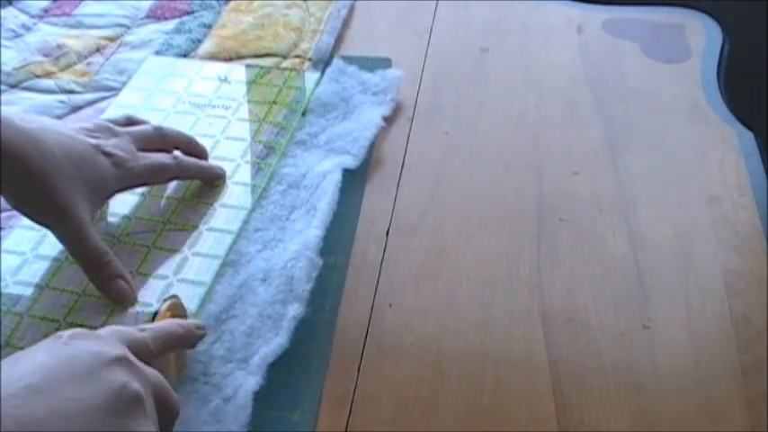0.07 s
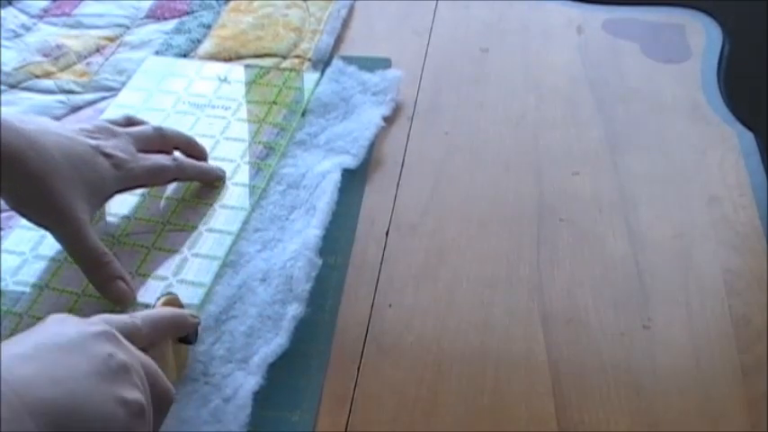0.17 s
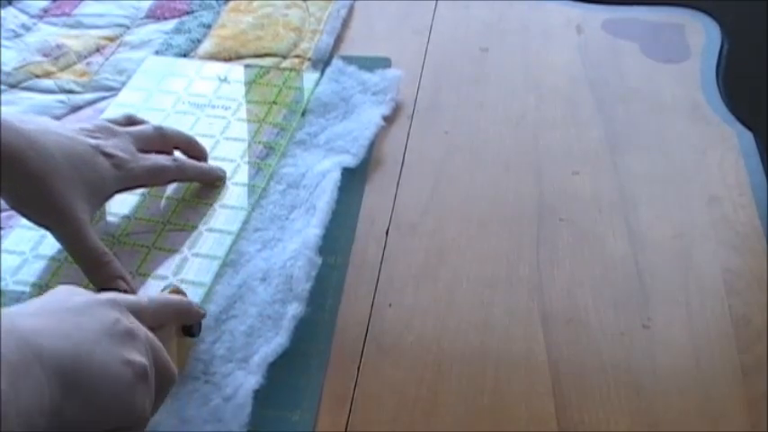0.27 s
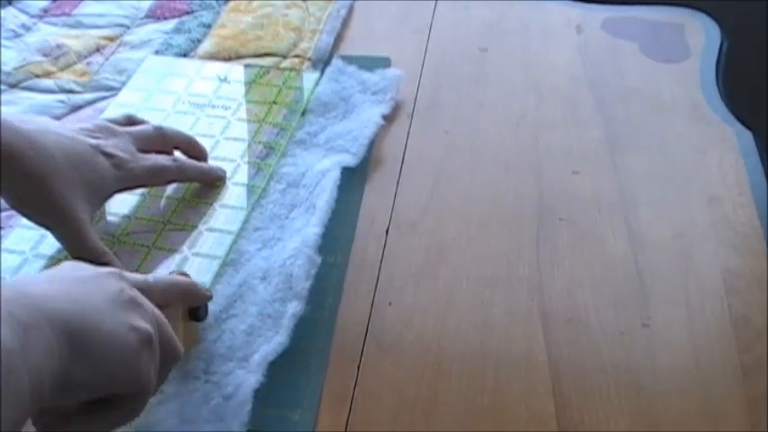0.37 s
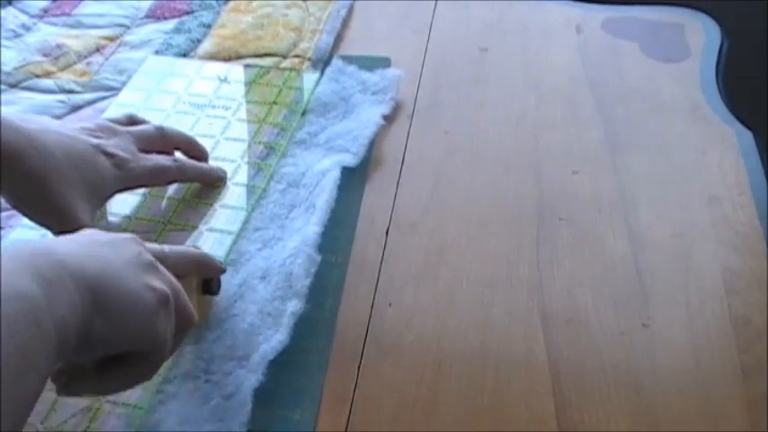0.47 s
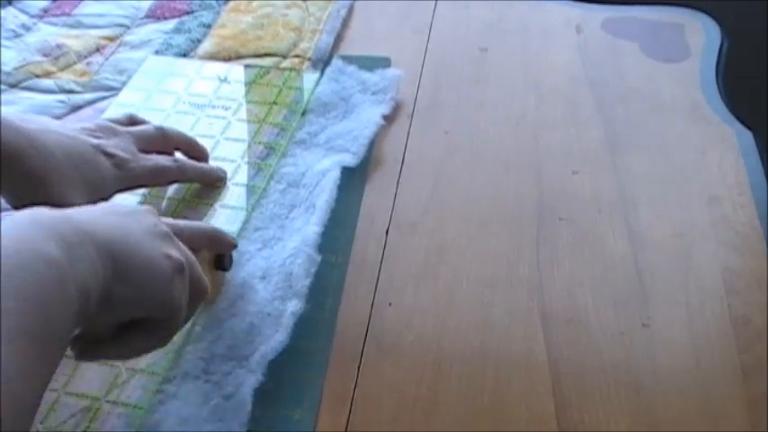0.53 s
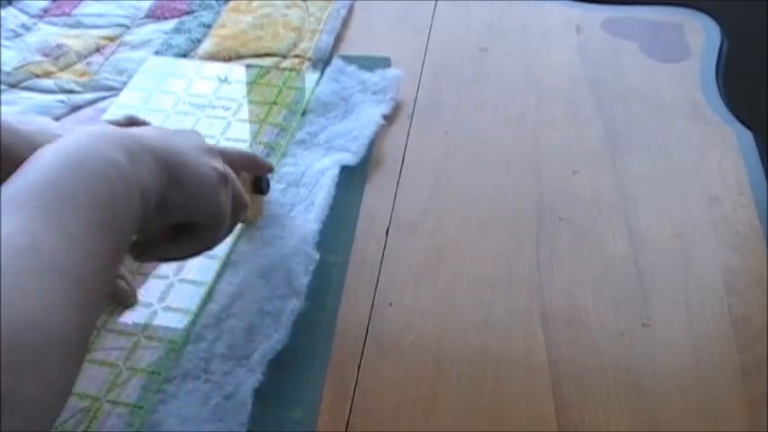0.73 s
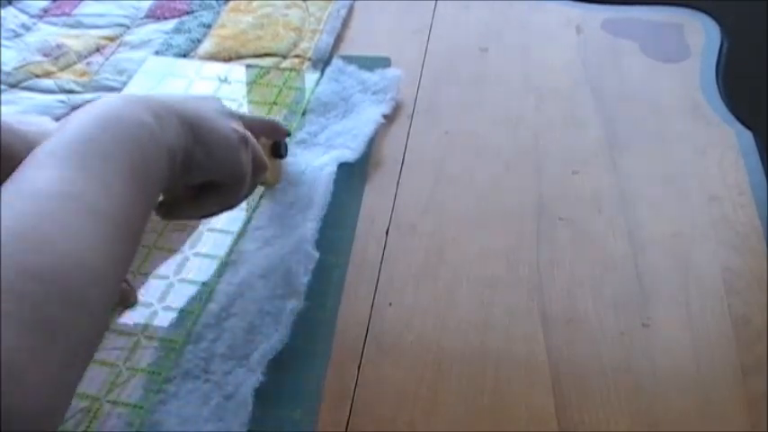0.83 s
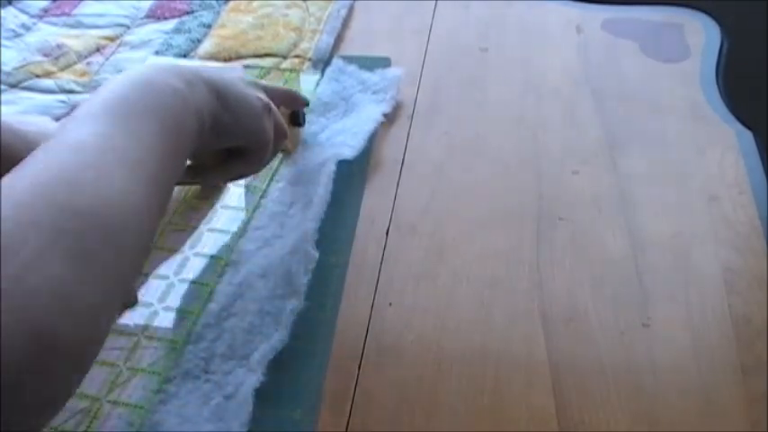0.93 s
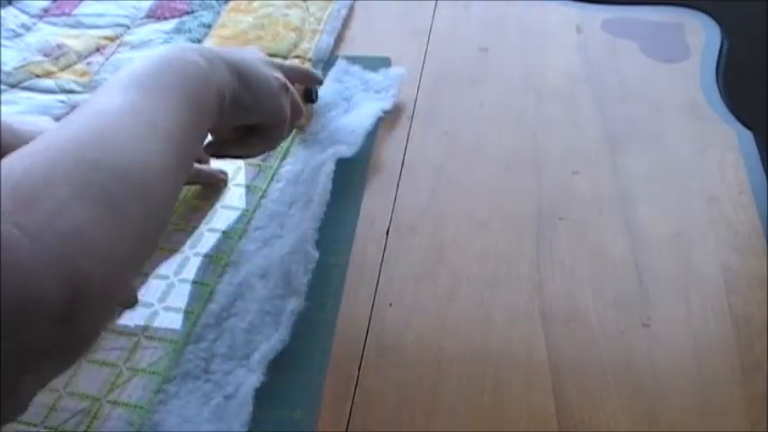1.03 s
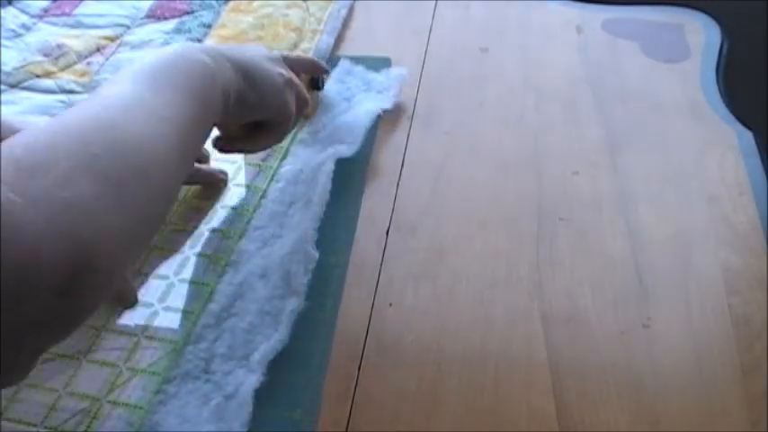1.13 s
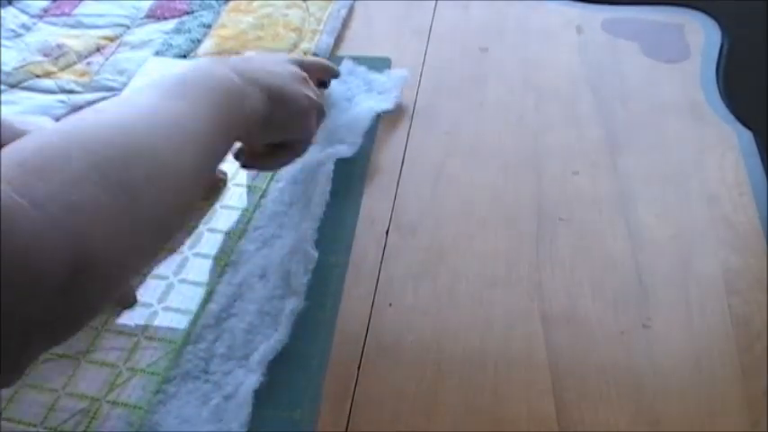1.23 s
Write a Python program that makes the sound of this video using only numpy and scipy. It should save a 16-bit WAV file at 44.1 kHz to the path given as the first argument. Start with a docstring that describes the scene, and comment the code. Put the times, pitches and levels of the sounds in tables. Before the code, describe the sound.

A rotary cutter slices batting on a mat over a table, heard close in stereo in a small quiet room. Tiny plastic handle ticks come at 0-0.1 seconds, then a sharp woody knock with a quick bounce at 0.2. A crunchy, crackling roll swells from 0.3, strongest about 0.55-1.1, with crisp fibre snaps. It rolls off softly until 1.25, leaving faint hiss and whine.

```python
"""In a small quiet room, heard from close by, the handle of a rotary cutter ticks as it is gripped.
The wheel is set down on a cutting mat and bounces: noise cracks over a knock of fading sine waves.
It rolls along a ruler through batting: random snaps ring mat and table and are heard as crisp treble.
The blade runs off the batting, rolls on softly and stops, leaving hiss and a faint whine.
Filtered echoes and a short noise-built tail place the cutter in the room, in stereo."""
import sys
import numpy as np
from scipy import signal
from scipy.fft import rfft, irfft
from scipy.io import wavfile

SR = 44100
rng = np.random.default_rng(int(sys.argv[2]) if len(sys.argv) > 2 else 0)


def generate_wav(sig):
    """Save sig (samples, or channels by samples) to the path in sys.argv[1] as 16-bit PCM at SR."""
    pcm = np.round(np.clip(np.atleast_2d(sig).T, -1, 1) * 32767).astype(np.int16)
    wavfile.write(sys.argv[1], SR, pcm)


N = 57330  # length of the scene in samples, 1.3 s

# broad colour of something snapping against the mat: f/Hz, level/dB
MAT_COLOUR = [(40, -44), (120, -45.5), (220, -27), (330, -15), (480, -7.5), (800, -2.5), (1050, -8),
              (1500, -2.5), (2200, -8), (3300, -7.5), (4400, -19), (8000, -26.5), (11000, -42),
              (15000, -83)]


def amp(db):
    """Turns decibels into a gain: every 20 dB is a factor of ten."""
    return 10 ** (np.asarray(db) / 20)


def evened(x):
    """Scales a sound to an average strength (rms) of 1."""
    return x / np.sqrt(np.mean(x ** 2) + 1e-20)


def read(points, hz):
    """Reads a table at the given frequencies, with straight lines on a log-frequency axis."""
    f, value = np.transpose(points)
    return np.interp(np.log(hz + 1), np.log(f + 1), value)


def level(points):
    """Gain over time, joining rows of time and decibels with straight lines."""
    return amp(np.interp(np.arange(N) / SR, *np.transpose(points)))


def add(mix, s, sound):
    """Mixes a sound in, starting at s seconds."""
    part = mix[max(round(s * SR), 0):][:len(sound)]
    part += sound[:len(part)]


def flipped(x):
    """The same snaps, each pushing one way or the other at random."""
    return x * rng.choice([-1., 1.], len(x))


def colour(x, points, size=4096):
    """Filters to the given spectrum, with no sound ahead of its cause (minimum phase)."""
    log_gain = np.log(amp(read(points, abs(np.fft.fftfreq(size, 1 / SR)))))
    spectrum = np.exp(np.conj(signal.hilbert(log_gain)))
    taps = np.fft.ifft(spectrum).real[:size // 2]
    return signal.fftconvolve(x, taps)[:len(x)]


def resonate(x, hz, width):
    """One steep-sided resonance of gain 1; hz may be a curve over time."""
    r = np.exp(-np.pi * width / SR)
    turn = np.exp(2j * np.pi * np.cumsum(hz * np.ones(len(x))) / SR)
    # shift the resonance down to 0 Hz, smooth twice, shift back up
    shifted = x / turn + 1e-18
    smooth = signal.lfilter([(1 - r) ** 2], [1, -2 * r, r ** 2], shifted)
    return 2 * (turn * smooth).real


def burst(decay_s, points, size=2048):
    """A short crack of energy 1: fading noise, coloured by the given spectrum."""
    fade = np.exp(-np.arange(size) / SR / decay_s)
    crack = colour(rng.standard_normal(size) * fade, points)
    return crack / np.linalg.norm(crack)


def surges(rate_hz, depth_db):
    """A gain that rises and falls at random, mostly around the given rate; depth is its rms in dB."""
    ratio = np.fft.rfftfreq(N, 1 / SR) / rate_hz
    spectrum = rfft(rng.standard_normal(N)) * ratio ** .5 / (1 + ratio ** 2)
    return amp(depth_db * evened(irfft(spectrum, N)))


def room_tone():
    """Soft coloured hiss, partly alike on left and right, with a faint steady whine."""
    # colour of the hiss: f/Hz, relative level per Hz/dB
    hush = [(25, -34), (60, -17), (130, -2), (400, 4), (1100, 2), (2000, -8.5), (3400, -5.5), (5200, -13.5),
            (7500, -12), (10000, -19), (15000, -33)]
    # left-right likeness of the hiss: f/Hz, likeness (1 the same, 0 unrelated, -1 opposite)
    likeness = [(60, -0.48), (400, -0.044), (2000, -0.74), (6000, 0.67), (15000, -0.28)]
    hiss_db, whine_db, whine_hz = -57.5, -71, 1066  # both levels rms
    hz = np.fft.rfftfreq(N, 1 / SR)
    a, b = rfft(rng.standard_normal((2, N))) * amp(read(hush, hz))
    same = np.clip(read(likeness, hz), -1, 1)
    right = same * a + np.sqrt(1 - same ** 2) * b
    hiss = evened(irfft(np.array([a, right]), N))
    whine = np.sqrt(2) * np.sin(2 * np.pi * whine_hz * np.arange(N) / SR)
    return amp(hiss_db) * hiss + amp(whine_db) * whine


def room(x):
    """A short tail made of noise, with a separate fading time for each frequency."""
    # time for the tail to fade by 60 dB: f/Hz, t/s
    fade_times = [(100, 0.92), (1000, 0.44), (4000, 0.078), (15000, 0.32)]
    t = np.arange(SR // 3) / SR
    noise = rng.standard_normal(len(t)) * (t > .008)
    hz, at, z = signal.stft(noise, SR, nperseg=256)
    fade = amp(-60 * at / read(fade_times, hz)[:, None])
    tail = signal.istft(z * fade, SR, nperseg=256)[1][:len(t)]
    return signal.fftconvolve(x, tail / np.linalg.norm(tail))[:N]


def echoes(x, count=12):
    """Quick echoes off the table top and arms; their pattern changes as the cutter travels."""
    decay_s = 0.0085
    t, place = np.arange(SR // 25) / SR, np.linspace(0, count - 1, N)
    out = np.zeros(N)
    for k in range(count):
        taps = rng.standard_normal(len(t)) * np.exp(-t / decay_s) * (t > .001)
        near = np.cos(np.pi / 2 * np.clip(place - k, -1, 1))  # blends one pattern into the next
        out += signal.fftconvolve(x * near, taps / np.linalg.norm(taps))[:N]
    return out


def handle():
    """Tiny plastic ticks as the handle is gripped: short noise cracks, partly dulled by the mat."""
    # the ticks: t/s, level/dB, share of the mat's colour (0-1)
    ticks = [(.002, -26, 0.04), (.0068, -25.5, 0.02), (0.0593, -32, 0.75), (0.079, -33.5, 0.55)]
    # colour of the plastic: f/Hz, level/dB
    plastic = [(100, -57), (3500, -23), (4500, 13.5), (5600, 6), (7300, 18), (8500, -6), (15000, -24)]
    out = np.zeros(N)
    for s, db, share in ticks:
        bright = (1 - share) * burst(0.0015, plastic)
        dull = share * burst(0.002, MAT_COLOUR)
        add(out, s, amp(db) * (bright + dull))
    return out


def set_down():
    """The wheel meets the mat and bounces; each contact cracks and rings the table briefly."""
    # contacts: t/s, level/dB
    contacts = [(0.2081, 1), (0.2154, -8.5), (0.2432, -27)]
    # ringing modes of the knock: f/Hz, level/dB, time to fade by 60 dB t/s
    modes = [(400, -40, 0.086), (490, -37, 0.087), (810, -43, 0.11), (906, -31.5, 0.078), (1083, -35, .055),
             (1242, -30, 0.032), (1346, -34, 0.084), (1703, -33.5, .025), (1760, -32, 0.032),
             (2110, -42, 0.034), (2530, -41, 0.037), (3054, -43, 0.032), (3500, -46.5, .025)]
    # colour of each crack: f/Hz, level/dB
    contact_colour = [(50, -42), (150, -14), (380, 6.5), (900, 5), (1500, -1), (2400, -2), (4200, -16),
                      (5500, -13), (7200, -4.5), (9000, -23), (15000, -52)]
    crack_db, crack_decay_s = -15.5, .003  # level is added to that of the contact
    rise_cycles = 1.22  # counted in cycles, so low modes take longer to build up
    out, t = np.zeros(N), np.arange(SR // 4) / SR
    ring = np.zeros(len(t))
    for hz, db, t60 in modes:
        rise = 1 - np.exp(-(t * hz / rise_cycles) ** 2)
        ring += amp(db - 60 * t / t60) * rise * np.sin(2 * np.pi * hz * t)
    for s, db in contacts:
        add(out, s, amp(db) * ring)
        add(out, s, amp(crack_db + db) * burst(crack_decay_s, contact_colour))
    return out


def snaps():
    """Fibres snap at random with uneven strength, over a smooth rub, nearly evenly spread."""
    snaps_per_s, spread_db, rub = 2500, 3, 0.4  # rub is its strength beside the clicks
    surge_hz, surge_db = 151, 0.53
    size = amp(spread_db * np.minimum(rng.exponential(1, N), 3.5))
    clicks = size * rng.choice([-1., 1.], N) * (rng.random(N) < snaps_per_s / SR)
    rubbed = evened(clicks) + rub * rng.standard_normal(N)
    return evened(rubbed * surges(surge_hz, surge_db))


def tuft(size=1024):
    """One sharp snap, then a brief crumble of the fibres around it; energy 1."""
    decay_s, crumble_db = 0.0013, -3  # level beside the snap
    crumble = rng.standard_normal(size) * np.exp(-np.arange(size) / SR / decay_s)
    snap = signal.unit_impulse(size) + amp(crumble_db) * crumble / np.linalg.norm(crumble)
    return snap / np.linalg.norm(snap)


def table_ring(pressed):
    """Resonances of mat and table, each driven hardest as the wheel passes one spot, and gliding."""
    # one resonance a row: passing t/s, reach t/s, f at passing/Hz, glide/(Hz per s), width/Hz,
    # level/dB
    resonances = [(0.52, 0.17, 3265, 0, 470, -2), (0.52, 0.14, 1352, -100, 156, 5.5),
                  (0.48, 0.23, 1170, 102, 58, 6.5), (0.521, 0.096, 2517, 402, 244, 5.5),
                  (0.54, 0.2, 1837, 8, 170, 0.5), (.57, 0.26, 805, 62, 52, 5), (0.653, .1, 2930, 9, 450, 3),
                  (0.712, 0.093, 1924, 900, 202, 6), (0.883, 0.16, 1260, -300, 160, 4),
                  (0.858, 0.089, 2516, 1498, 550, 5), (0.94, 0.8, 483, -100, 170, -3),
                  (0.84, .22, 3640, 5, 540, -4.5), (0.972, 0.051, 2880, 1000, 160, 2.5),
                  (0.983, 0.05, 625, 0, 82, 6.5), (1.035, 0.041, 2085, 2000, 590, 5.5),
                  (1.089, 0.027, 1037, 0.5, 220, 2.5), (1.085, 0.024, 1288, -3, 155, 10),
                  (1.18, 0.033, 1312, -5, 49, 12), (1.153, 0.034, 2390, 4000, 590, 4.5)]
    low_cut_hz = 304  # keeps the lows out of the ringing
    t, ring = np.arange(N) / SR, np.zeros(N)
    for passing, reach, hz, glide, width, db in resonances:
        near = np.exp(-.5 * ((t - passing) / reach) ** 2)
        gliding_hz = hz + glide * (t - passing)
        ring += amp(db) * resonate(flipped(pressed) * near, gliding_hz, width)
    low_cut = signal.butter(4, low_cut_hz, "high", fs=SR, output="sos")
    return signal.sosfilt(low_cut, ring)


def ruler_rasp(drive):
    """A thin rasp of the blade's edge on the ruler: the snaps through one high resonance."""
    # the rasp: middle t/s, spread around it t/s, f/Hz, width/Hz
    rasp_shape = (.936, .016, 9300, 1500)
    s, length, hz, width = rasp_shape
    swell = np.exp(-.5 * ((np.arange(N) / SR - s) / length) ** 2)
    return amp(-44) * swell * evened(resonate(drive, hz, width))


def cut():
    """The snaps drive the mat and the table's resonances, and are heard directly as crisp treble."""
    # force on the blade, before the body gain: t/s, level/dB
    force = [(.2, -62.5), (.26, -55), (.33, -44.5), (.39, -46.5), (.44, -40.5), (.51, -42), (.555, -35),
             (.615, -36), (.65, -37.5), (.68, -34), (.8, -36.5), (.89, -36), (.94, -33), (1.005, -37.5),
             (1.037, -36), (1.06, -37.5), (1.09, -35), (1.125, -54.5), (1.2, -47.5), (1.26, -62.5)]
    # the crisp treble of the shearing fibres: t/s, level/dB
    shear_level = [(.2, -74), (.3, -60.5), (.4, -61), (.45, -53.5), (.52, -52), (.58, -42), (.615, -48.5),
                   (.67, -47), (.76, -41.5), (.81, -45), (.89, -45), (.935, -43), (1.0, -45.5),
                   (1.045, -44), (1.065, -50), (1.1, -50), (1.13, -60), (1.195, -54), (1.25, -71)]
    # colour of the shearing: f/Hz, level/dB
    fibre_colour = [(100, -34.5), (2000, -5), (3800, 2), (5300, -1.5), (7200, 0.5), (8600, -7),
                    (10000, -10), (11500, -16), (13500, -21.5), (15300, -35)]
    # thicker tufts that give way at once: t/s, push on the mat before the body gain: level/dB,
    # crisp crack: level/dB
    tufts = [(0.402, -21, -40), (0.4537, -17.5, -30), (0.4738, -15.5, -45), (.4885, -13, -36),
             (0.5472, -15, -26), (.579, -14, -24), (.603, -9.5, -32), (.621, -10, -29), (0.674, -6.5, -27),
             (0.685, -16.5, -23), (.696, -12, -29), (.731, -12.5, -26), (0.7524, -7, -29), (.765, -8, -29),
             (.786, -10.5, -22), (.8125, -11.5, -16.5), (.828, -13.5, -24), (1.035, -10, -23),
             (1.045, -14, -15), (1.073, -11, -32), (1.087, -12.5, -33)]
    crackle_hz, crackle_db = 59.6, 1  # the treble of the shearing surges unevenly
    body_db = 8  # gain of mat and table together
    drive = snaps()
    pressed = drive * level(force)
    crackle = flipped(drive) * surges(crackle_hz, crackle_db)
    shear = evened(colour(crackle, fibre_colour)) * level(shear_level)
    for s, push_db, crack_db in tufts:
        crack = colour(tuft(), fibre_colour)
        add(pressed, s, amp(push_db) * tuft())
        add(shear, s, amp(crack_db) * crack / np.linalg.norm(crack))
    body = colour(pressed, MAT_COLOUR) + table_ring(pressed)
    return amp(body_db) * body + shear + ruler_rasp(drive)


def scene():
    """The cutter, nearly centred; the knock's quick echoes are weaker in the middle than the stroke's."""
    # level of the side signal, which sets left and right apart: f/Hz, level/dB
    side_colour = [(60, -24), (200, 0), (400, -22), (1000, -16.5), (3000, -18.5), (6000, -14), (8300, -4.5),
                   (10500, -4.5), (15000, -40)]
    echo_db, knock_echo_db, room_db = -6.5, -5, -12  # the knock's is on top of echo_db
    side_room_db = -6.5  # beside the side echoes
    stroke, knock = cut() + handle(), set_down()
    direct = stroke + knock
    early = echoes(stroke + amp(knock_echo_db) * knock)
    mid = direct + amp(echo_db) * early + amp(room_db) * room(direct)
    side = colour(echoes(direct) + amp(side_room_db) * room(direct), side_colour)
    return np.array([mid + side, mid - side]) + room_tone()


def record(dry):
    """Two microphone ports: the left is louder except in the high treble; then the band limit."""
    # balance of the ports: f/Hz, left minus right level/dB
    balance = [(60, 1.5), (400, 3.5), (1300, 1.9), (4400, 1.5), (8500, 0), (15000, -1)]
    edge_hz = 15300  # little is heard above this
    lean_db = read(balance, np.fft.rfftfreq(N, 1 / SR)) / 2
    heard = irfft(rfft(dry) * amp(np.array([lean_db, -lean_db])), N)
    band_limit = signal.firwin(511, edge_hz, window=("kaiser", 9), fs=SR)
    return signal.oaconvolve(heard, band_limit[None], "same")


dry = scene()
out = record(dry)
generate_wav(out)
```